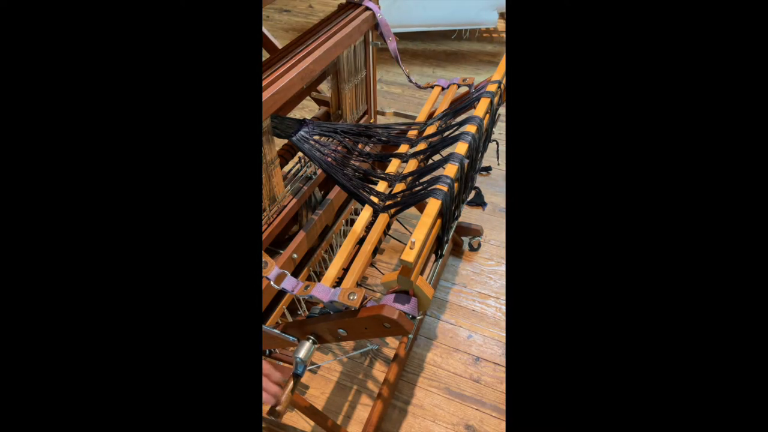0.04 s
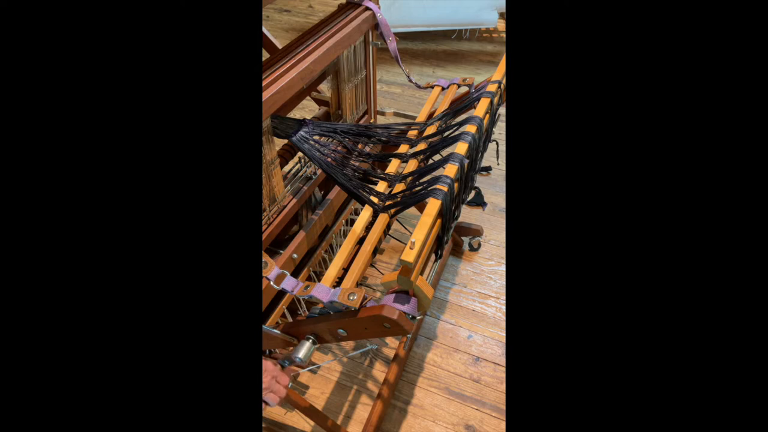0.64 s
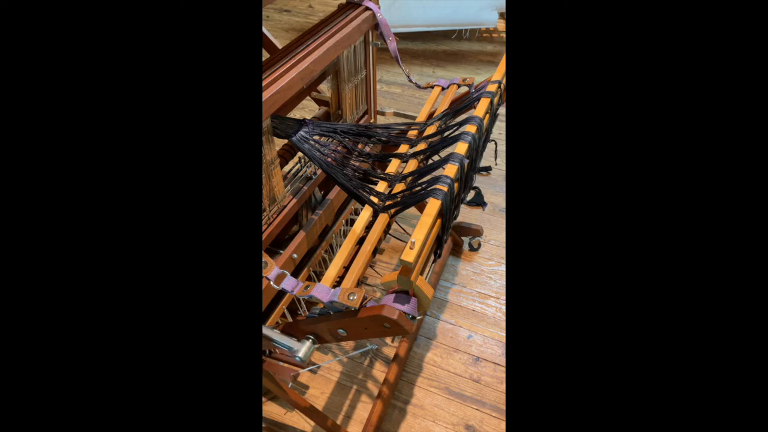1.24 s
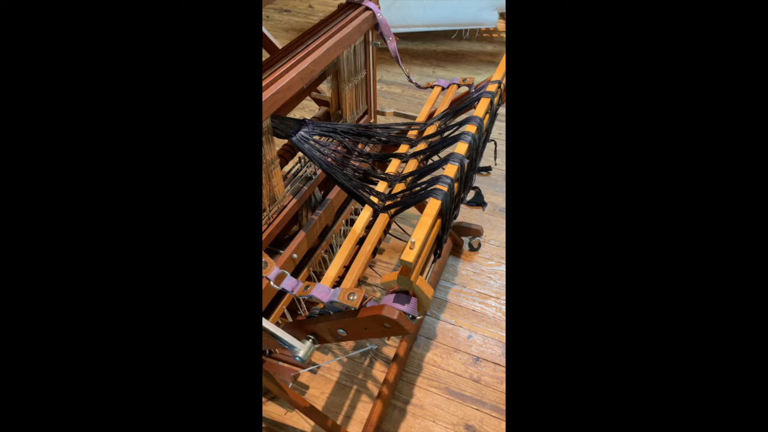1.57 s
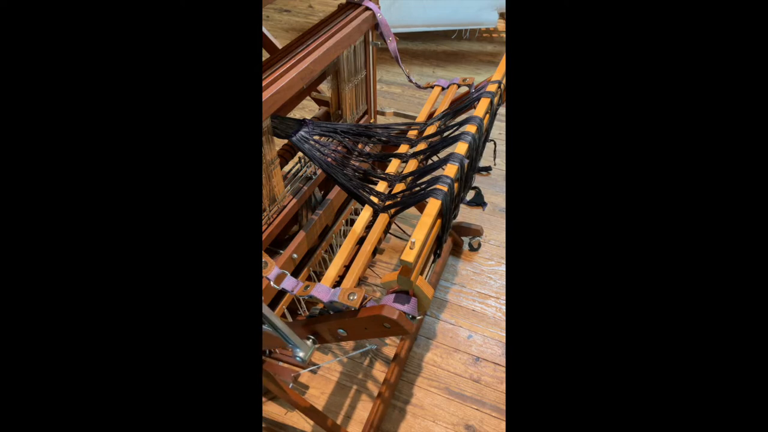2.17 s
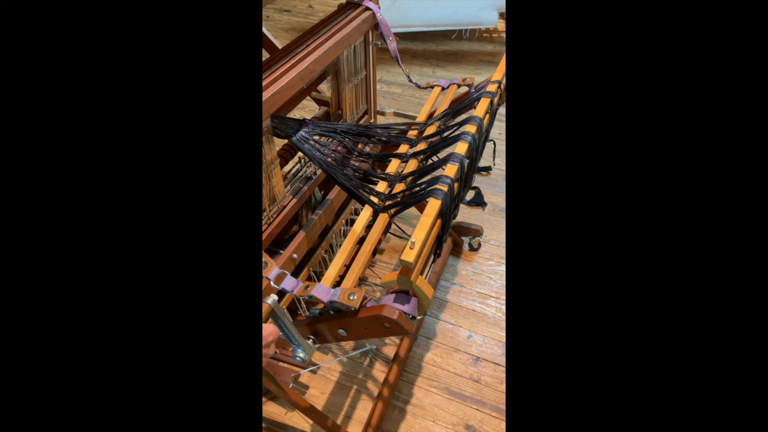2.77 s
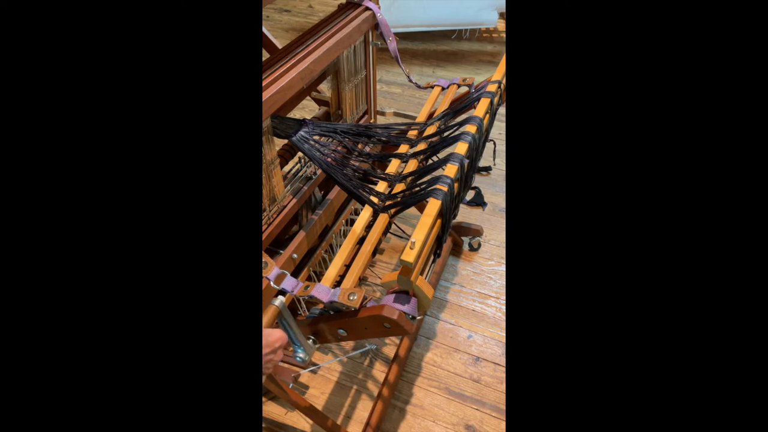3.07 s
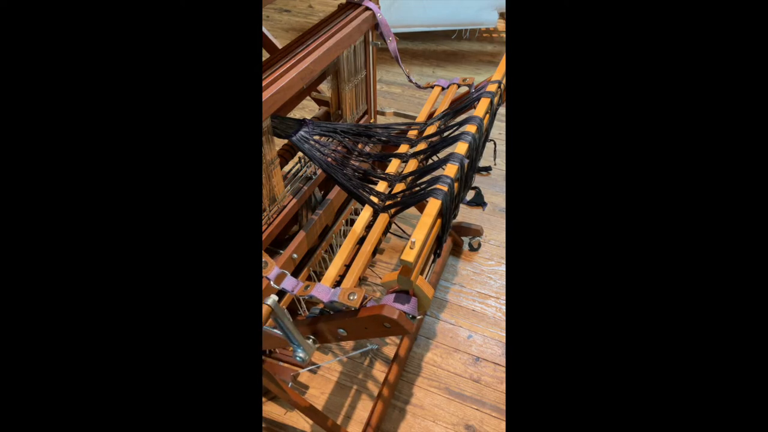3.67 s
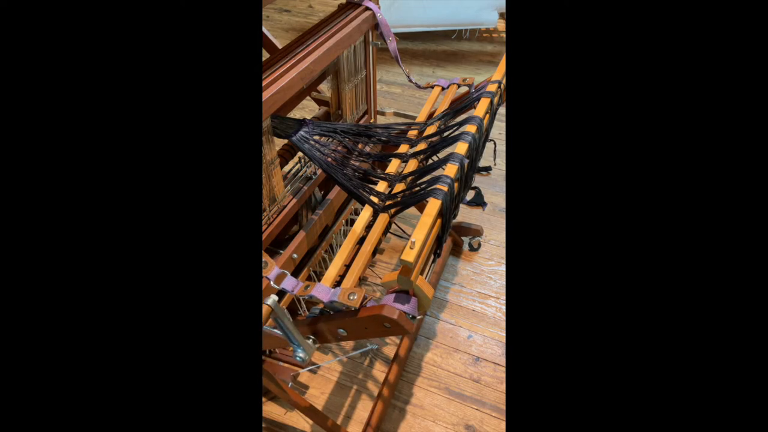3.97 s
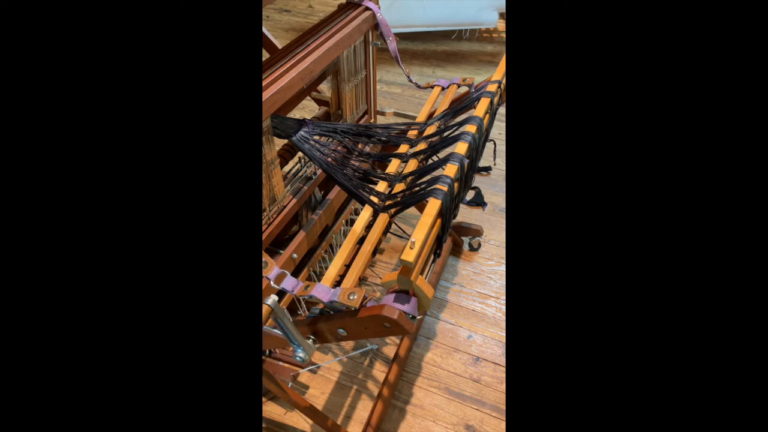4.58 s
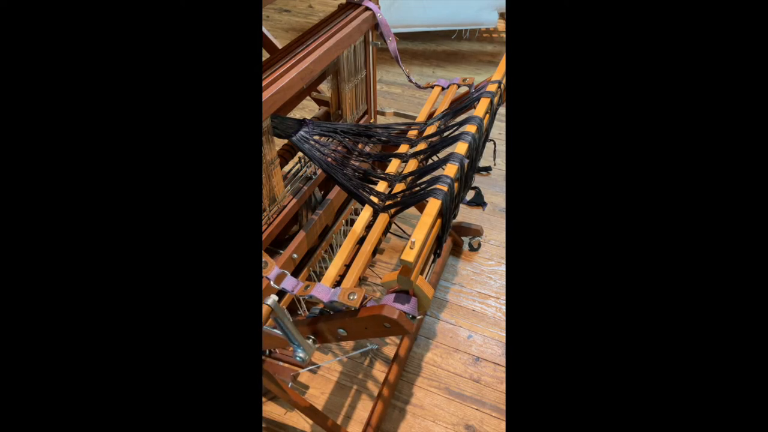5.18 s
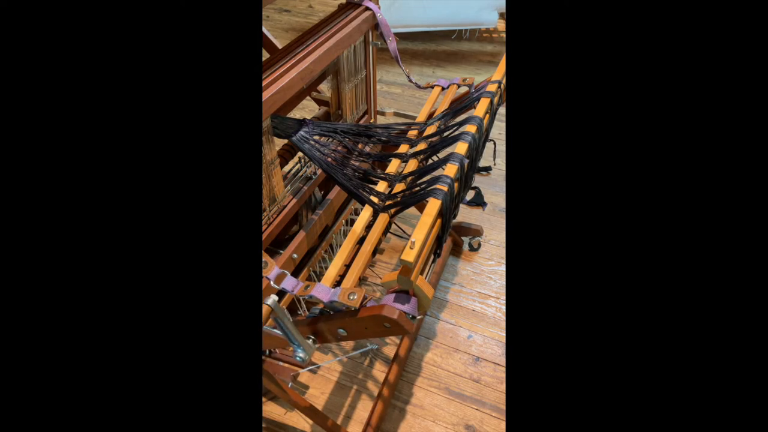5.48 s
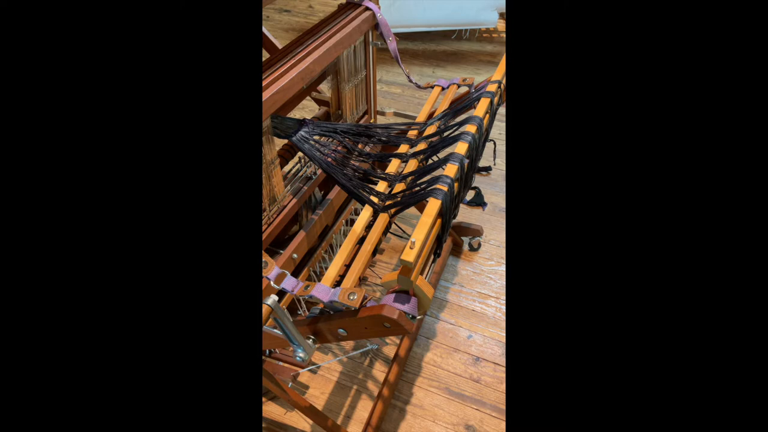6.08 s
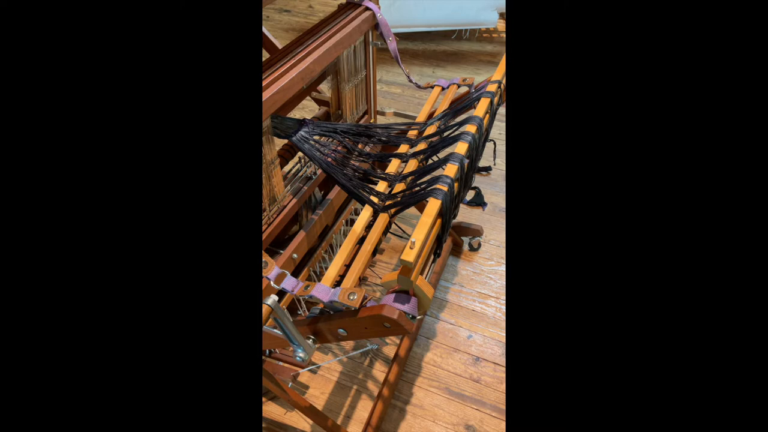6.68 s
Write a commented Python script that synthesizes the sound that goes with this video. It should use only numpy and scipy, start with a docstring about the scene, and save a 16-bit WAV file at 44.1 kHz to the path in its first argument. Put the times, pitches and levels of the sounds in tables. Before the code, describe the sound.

Faint judder and thin squeaks from a hand-cranked wooden loom, followed by irregular ratchet clicks, wooden knocks and rubbing cords.

```python
"""The beam of a wooden floor loom is cranked by hand in a room with a plank floor.
First the cords rub and the frame knocks lightly. From 0.6 s the axle judders in its wooden bearing
and squeaks in short slips, both by stick-slip friction. From 3.2 s the ratchet and frame knock as
the warp takes up tension, and cords rub over the beam. At 6.2 s one cord zips and jerks along it,
and the last knocks and rubs follow."""
import sys
import numpy as np
from scipy import signal
from scipy.fft import rfft, irfft
from scipy.io import wavfile

SR = 44100
rng = np.random.default_rng(int(sys.argv[2]) if len(sys.argv) > 2 else 0)


def unload_wav(signal):
    """Save mono or channel-first audio to the path in sys.argv[1] as 16-bit WAV at rate SR, clipped to [-1, 1]."""
    wavfile.write(
        sys.argv[1],
        SR,
        np.round(np.clip(np.atleast_2d(signal).T, -1, 1) * 32767).astype(np.int16),
    )


N = 301022
TIME = np.arange(N) / SR

# Steady background. Each row: frequency in Hz, relative spectral density in dB.
BACKGROUND_SPECTRUM = [(30, -29), (60, -3), (130, -4.5), (420, -16), (900, -26.5), (5500, -26),
                       (15500, -40)]
# Reverberation. Each row: frequency in Hz, time to decay by 60 dB in seconds.
REVERB_TIMES = [(150, .6), (1000, .45), (2700, .42), (5500, .45), (14000, .35)]
# Cords rubbing on wood. Each row: frequency in Hz, relative spectral density in dB.
RUB_SPECTRUM = [(60, 4), (150, 5), (500, 4), (900, 0.5), (2400, -1.5), (3500, -1.5), (5000, 2.5),
                (6800, -2.5), (15500, -15.5)]
# Pulls of the cords. Each row: fastest moment, rise and fall, all in seconds, relative level in dB.
CORD_PULLS = [(.03, 0.12, 0.16, -59.5), (.22, 0.055, 0.15, -58), (3.28, 0.38, 0.13, -59.5),
              (3.559, 0.13, 0.043, -58), (4.34, 0.31, 0.14, -61.5), (4.72, 0.34, 0.16, -62.5),
              (5.0, 0.16, 0.061, -54), (5.16, .1, .13, -68.5), (5.57, 0.16, 0.19, -56),
              (6.04, 0.071, 0.073, -57), (6.12, 0.026, 0.13, -54), (6.35, .19, .18, -53.5),
              (6.585, 0.072, 0.14, -50.5), (6.75, 0.05, 0.082, -56)]
# Course of the zipping cord. Each row: time in seconds, ribs per second, level in dB.
ZIP_COURSE = [(6.229, 3550, -53), (6.243, 3050, -47), (6.273, 2600, -47), (6.287, 1900, -47),
              (6.305, 1480, -53)]
# Dull bumps of the frame. Each row: start in seconds, centre frequency in Hz, relative level in dB.
FRAME_BUMPS = [(0.209, 116, -53), (0.257, 145, -52), (0.369, 164, -48.5), (0.513, 123, -61),
               (2.363, 104, -64), (3.245, 148, -59.5), (3.335, 173, -48), (3.45, 99, -61),
               (4.279, 238, -60), (4.909, 191, -53.5), (6.115, 544, -49.5)]
# Resonances of the frame. Each row: frequency in Hz, bandwidth in Hz, relative gain in dB.
FRAME_MODES = [(456.7, 270, -6), (792, 430, 7), (1093, 95, 11), (1670, 280, 7.5), (2066, 83, -9),
               (2492, 590, 9), (3420, 230, -7), (4490, 1120, 7.5), (5300, 270, -32), (7850, 3400, -18)]
# Ratchet and frame knocks. Each row: start in seconds, relative level in dB, relative treble in dB.
FRAME_KNOCKS = [(.206, -45, -35), (.362, -50.5, -8), (3.324, -33.5, 6), (3.328, -35.5, -43),
                (4.185, -53.5, -18), (4.264, -48.5, -10), (4.896, -28.5, -25), (5.515, -38, 1.5),
                (5.578, -42, -8), (6.112, -44, 1), (6.554, -39.5, -20), (6.572, -30.5, -18.5)]
# Pushes on the crank. Each row: start, length and spin-up, all in seconds, relative level in dB.
CRANK_PUSHES = [(0.588, 1.217, 0.052, -47.5), (1.799, 0.3, 0.14, -51.5), (2.105, 0.28, 0.13, -51),
                (2.506, .235, 0.12, -51), (2.841, 0.3, 0.15, -55.5)]
# The axle catches and lets go within a push. Each row: start in seconds, relative level in dB.
AXLE_CATCHES = [(.636, -50), (2.875, -52)]
# Resonances of the bearing. Each row: frequency in Hz, bandwidth in Hz, relative gain in dB.
BEARING_MODES = [(212, 53, -2), (711, 53.6, 1.5), (1050, 130, -8.5), (1426, 174, -5.5), (1810, 92, -1),
                 (2120, 410, -7), (2373, 126, 2), (3700, 2900, -21)]
# Slips of the dry axle.
# Each row: start in seconds, length in seconds, pitch in Hz, glide in octaves, level in dB.
AXLE_SLIPS = [(.885, .013, 6380, 0.092, -43), (.954, .018, 4910, -.1, -42),
              (0.981, 0.024, 4970, 0.3, -45.5), (1.02, 0.028, 4710, 0.049, -37.5),
              (1.109, 0.033, 5480, 0.146, -40.5), (1.165, 0.04, 4165, 0, -43.5),
              (1.202, 0.036, 4576, 0.182, -37), (1.235, 0.027, 4014, .05, -37.5),
              (1.338, 0.054, 4707, 0.21, -33.5), (1.389, .033, 4610, -0.031, -35),
              (1.394, 0.019, 5846, .04, -31.5), (1.417, 0.014, 6150, .16, -39),
              (1.492, .016, 6440, 0.091, -34.5), (1.694, 0.011, 4960, -0.22, -49.5),
              (1.717, 0.046, 7040, 0.039, -54), (1.873, 0.021, 5214, 0.24, -41),
              (1.906, 0.027, 5980, -0.16, -36), (2.639, 0.02, 3400, 0.035, -54),
              (2.692, 0.017, 4980, -0.015, -50), (2.899, 0.022, 5170, -0.0046, -53.5),
              (2.977, 0.031, 5150, .04, -44.5)]
# The axle bites hard and its squeak turns to a rasp. Each row: start in seconds, length in seconds.
AXLE_BITES = [(1.187, 0.076), (1.402, 0.1)]


def from_db(db):
    """Amplitude ratio: tenfold for every 20 dB."""
    return 10 ** (np.asarray(db) / 20)


def unit_rms(x):
    """Normalisation to unit mean power."""
    return x / np.sqrt(np.mean(x ** 2) + 1e-20)


def at_hz(points, hz):
    """Interpolation of a table on a logarithmic frequency axis."""
    table_hz, values = np.transpose(points)
    return np.interp(np.log(hz + 1e-9), np.log(table_hz), values)


def butter(x, hz, kind, order=2):
    """Causal low-, high- or band-pass filter with a maximally flat passband."""
    sections = signal.butter(order, np.clip(hz, 10, .48 * SR), kind, fs=SR, output="sos")
    return signal.sosfilt(sections, x + 1e-18)


def drift(rate_hz):
    """Random fluctuation: low-passed noise of unit rms."""
    return unit_rms(butter(rng.standard_normal(N + SR), rate_hz, "low")[SR:])


def coloured(x, spectrum):
    """Spectral weighting, normalised to unit rms."""
    hz = np.arange(N // 2 + 1) * SR / N
    return unit_rms(irfft(rfft(x) * from_db(at_hz(spectrum, hz)), N))


def resonate(x, hz, width_hz):
    """Forced response of a damped oscillator with unit gain at its peak."""
    radius = np.exp(-np.pi * width_hz / SR)
    feedback = [1, -2 * radius * np.cos(2 * np.pi * hz / SR), radius ** 2]
    return signal.lfilter(np.array([1, 0, -1]) * (1 - radius ** 2) / 2, feedback, x + 1e-18)


def swell(progress, edge):
    """Raised-cosine envelope over progress 0..1; rise and fall each take the share `edge`."""
    return np.sin(np.pi / 2 * np.clip(np.minimum(progress, 1 - progress) / edge, 0, 1)) ** 2


def add(out, start_s, sound):
    """Superposition of a sound from its start time on."""
    i = max(int(start_s * SR), 0)
    out[i:i + len(sound)] += sound[:N - i]


def background(level_db=-69.5):
    """Stationary noise of the room, strongest in the bass."""
    return from_db(level_db) * coloured(rng.standard_normal(N), BACKGROUND_SPECTRUM)


def room(x, wet_db, first_s=0.002, build_s=0.004):
    """Reverberation: reflections build up after the direct sound and decay exponentially by band."""
    t, tail = TIME[:SR], 0
    edges_hz = np.geomspace(50, 18000, 12)
    for low, high in zip(edges_hz, edges_hz[1:]):
        band = butter(rng.standard_normal(SR), [low, high], "band")
        tail = tail + band * from_db(-60 * t / at_hz(REVERB_TIMES, np.sqrt(low * high)))
    tail *= np.clip((t - first_s) / build_s, 0, 1)
    return x + from_db(wet_db) * signal.fftconvolve(x, tail / np.linalg.norm(tail))[:N]


def cranking(slow_start_db=-13, tire_db_per_s=10, stop_s=0.13):
    """Driving effort on the beam, as a gain: each push spins up, tires and comes to rest."""
    effort = np.zeros(N)
    for start, length, spin_up_s, db in CRANK_PUSHES:
        t = TIME[:int(length * SR)]
        spin_up_db = slow_start_db * np.clip(1 - t / spin_up_s, 0, 1)
        tired_db = tire_db_per_s * np.maximum(t - spin_up_s, 0)
        stopping = np.clip((length - t) / stop_s, 0, 1)
        add(effort, start, from_db(db + spin_up_db - tired_db) * stopping)
    return effort


def rubbing_cords(grain_db=2.5, flicker_db=2.5, warp_db=-11.5, hiss_hz=6400, hiss_db=2.5):
    """Sliding friction: fibres catch on the wood in tiny grains, brighter as a pull speeds up."""
    grains = rng.standard_normal(N) * from_db(grain_db * drift(1350) + flicker_db * drift(45))
    rub = coloured(grains, RUB_SPECTRUM)
    low_rub = butter(rub, hiss_hz, "low", order=3)
    hiss = from_db(hiss_db) * butter(rub, hiss_hz, "high", order=3)
    # the warp rubs on the beam whenever it is cranked
    out = from_db(warp_db) * cranking() * unit_rms(butter(rub, 10000, "low"))
    for peak_s, rise_s, fall_s, db in CORD_PULLS:
        speed = np.interp(TIME - peak_s, [-rise_s, 0, fall_s], [0, 1, 0]) ** 1.05
        out += from_db(db) * (low_rub * speed + hiss * speed ** 1.9)
    return out


def zipping_cord(uneven=.12, second_db=-10, third_db=-17):
    """Repetition pitch: the ribs of a slowing braid tick over an edge as a rough, falling tone."""
    times, rib_hz, db = np.transpose(ZIP_COURSE)
    hz = np.interp(TIME, times, rib_hz) * (1 + uneven * drift(900))
    phase = 2 * np.pi * np.cumsum(hz) / SR
    tone = np.sin(phase) + from_db(second_db) * np.sin(2 * phase) + from_db(third_db) * np.sin(3 * phase)
    sliding = (TIME > times[0]) & (TIME < times[-1])
    return unit_rms(tone) * from_db(np.interp(TIME, times, db)) * sliding


def cord_jerks(start_s=6.31, first_gap_s=.0187, slowing=1.11, count=5, db=-36, treble_db=-17.5):
    """Stick-slip: the zipping cord ends in jerks at widening intervals, given as rows of knocks."""
    gaps = first_gap_s * slowing ** np.arange(count)
    return [(start, db, treble_db) for start in start_s + np.cumsum(gaps) - gaps]


def bumps(spread=1.72, decay_s=0.035):
    """Modal overlap: the many low modes of the heavy frame merge into a brief, decaying noise band."""
    out, t = np.zeros(N), TIME[:SR // 4]
    for start, hz, db in FRAME_BUMPS:
        burst = rng.standard_normal(len(t)) * np.exp(-t / decay_s)
        shudder = butter(burst, [hz / spread, hz * spread], "band")
        add(out, start, from_db(db) * unit_rms(shudder) * np.sqrt(decay_s / t[-1]))
    return out


def knocks(bass_lag_s=0.0042, treble_hz=4000, bright_db=8, contact_hz=8500, level_db=-19):
    """Impacts ring the frame's modes; dispersion of bending waves brings the treble before the bass."""
    out, t = np.zeros(N), TIME[:SR // 10]
    contact = butter(1. * (t == 0), contact_hz, "low")
    for start, db, treble_db in FRAME_KNOCKS + cord_jerks():
        blow = np.zeros(len(t))
        for k, (hz, width, mode_db) in enumerate(FRAME_MODES):
            # wave speed grows as the square root of frequency
            lag = int(bass_lag_s * SR * np.sqrt(FRAME_MODES[0][0] / hz))
            hardness_db = (treble_db + bright_db) / (1 + (treble_hz / hz) ** 4)
            gain = (-1) ** k * from_db(mode_db + hardness_db + rng.normal(0, 2))
            blow[lag:] += gain * resonate(contact, hz, width)[:len(t) - lag]
        add(out, start, from_db(db + level_db) * unit_rms(blow))
    return out


def frame_echoes(x, decay_s=0.0088):
    """Multiple reflection: waves bounce about within the frame for a few milliseconds."""
    t = TIME[:SR // 20]
    echoes = rng.standard_normal(len(t)) * np.exp(-t / decay_s)
    return signal.fftconvolve(x, echoes / np.linalg.norm(echoes))[:N]


def axle_judder(slips_hz=520, uneven=.3, spread_db=2.5, grit_db=-4, jerk_db=-53.5, jerk_s=0.011):
    """Stick-slip friction: hundreds of slips a second drive the bearing's resonances during a push."""
    slip_count = np.cumsum(slips_hz * np.exp(uneven * drift(200))) / SR
    slips = np.diff(np.floor(slip_count), prepend=0) * from_db(spread_db * rng.standard_normal(N))
    friction = unit_rms(slips) + from_db(grit_db) * rng.standard_normal(N)
    bearing = sum((-1) ** k * from_db(db + 2 * drift(9)) * resonate(friction, hz, width)
                  for k, (hz, width, db) in enumerate(BEARING_MODES))
    effort = cranking()
    # static friction lets go with a jerk at each push and each catch
    for start, db in [(push[0], jerk_db) for push in CRANK_PUSHES] + AXLE_CATCHES:
        add(effort, start, from_db(db) * np.exp(-TIME[:SR // 10] / jerk_s))
    return from_db(-2) * effort * unit_rms(bearing)


def axle_squeaks(waver=0.027, flutter_db=3, sharp_octaves=.09, settle_s=.005, jitter_rad=0.23):
    """Self-excited oscillation: each slip is a gliding tone; a bite adds rasp and period doubling."""
    out, wobble, grip = np.zeros(N), drift(260), from_db(flutter_db * drift(212.6))
    rasp = butter(rng.standard_normal(N), [3500, 11000], "band", order=1)
    stagger, jitter = drift(300), drift(900)
    # a little roughness is present even between bites
    bite = 0.2 + sum(swell((TIME - start) / length, edge=.24) for start, length in AXLE_BITES)
    loudest_db = max(slip[-1] for slip in AXLE_SLIPS)
    for start, length, pitch_hz, glide, db in AXLE_SLIPS:
        progress = np.linspace(0, 1, int(length * SR))
        span = int(start * SR) + np.arange(len(progress))
        # every slip starts sharp and settles onto its glide
        octaves = glide * (progress - .5) + sharp_octaves * np.exp(-progress * length / settle_s)
        unrest = waver * from_db(.5 * (db - loudest_db))   # weak slips hold their pitch better
        hz = pitch_hz * 2 ** octaves * (1 + unrest * wobble[span])
        phase = 2 * np.pi * np.cumsum(hz) / SR + jitter_rad * bite[span] * jitter[span]
        tone = np.sin(phase) + from_db(-18) * np.sin(2 * phase) + from_db(-17) * np.sin(3 * phase)
        # the lower octave is only strong where it meets a resonance of the wood
        subharmonic = from_db(-1.5) * resonate(stagger[span] * np.sin(phase / 2), hz=2280, width_hz=133)
        grit = from_db(-12) * rasp[span] * np.sin(phase / 2) ** 2   # torn off once a cycle
        squeak = (tone + bite[span] * (subharmonic + grit)) * swell(progress, edge=.24) * grip[span]
        add(out, start, from_db(db) * unit_rms(squeak))
    return out


def scene():
    """Superposition of the nearby loom, its reverberation and a quiet background."""
    blows = knocks()
    loom = room(blows, wet_db=0.5) + frame_echoes(blows)
    loom += room(axle_squeaks() + zipping_cord(), wet_db=-7)
    loom += room(axle_judder() + bumps(), wet_db=-10)
    loom += room(rubbing_cords(), wet_db=-4)
    return (loom + background())[None]


def record(dry, rumble_hz=52, cutoff_hz=15500):
    """Band limiting: the microphone drops the deep bass, and the highest treble is cut steeply."""
    low_pass = signal.ellip(10, .2, 80, cutoff_hz, fs=SR, output="sos")
    return signal.sosfilt(low_pass, butter(dry, rumble_hz, "high", order=5))


dry = scene()
out = record(dry)
unload_wav(out)
```